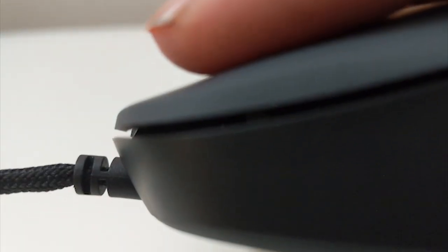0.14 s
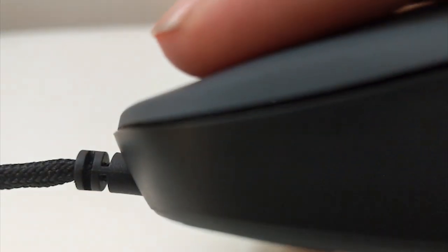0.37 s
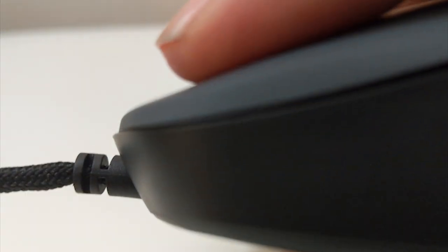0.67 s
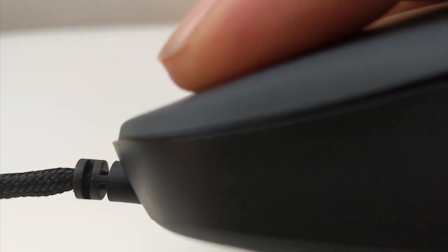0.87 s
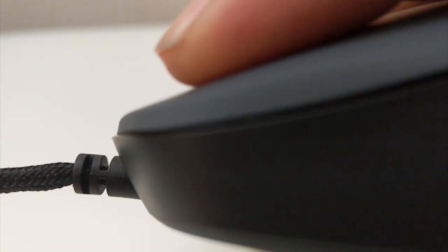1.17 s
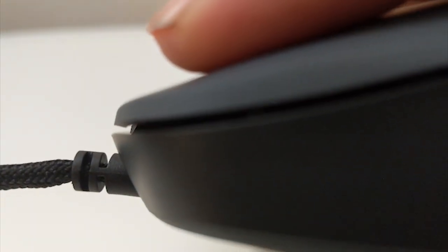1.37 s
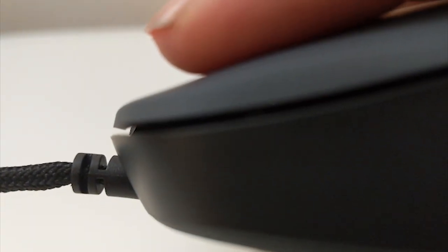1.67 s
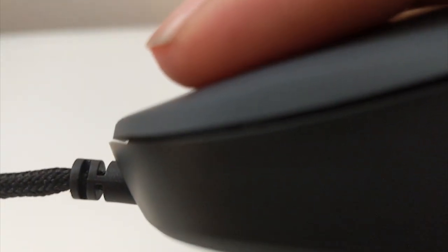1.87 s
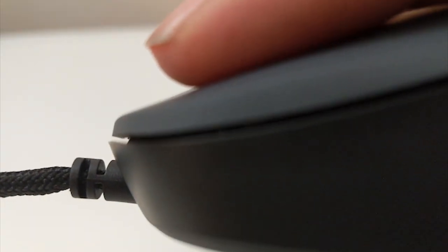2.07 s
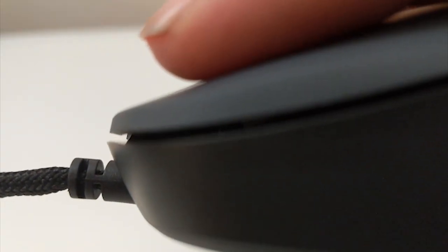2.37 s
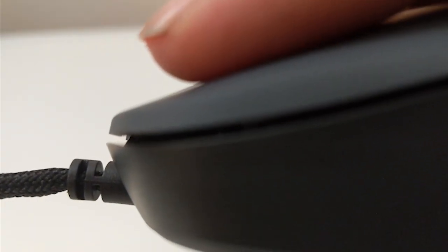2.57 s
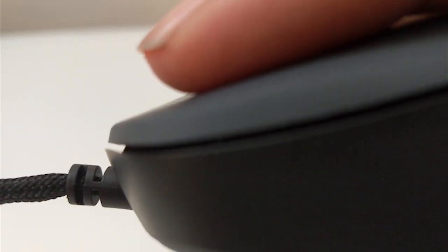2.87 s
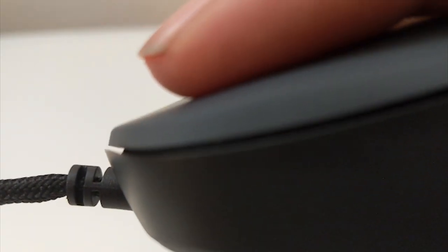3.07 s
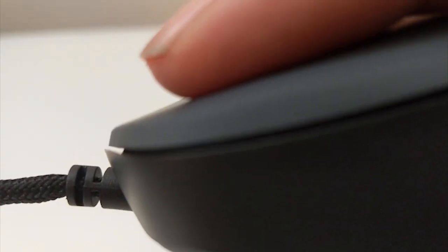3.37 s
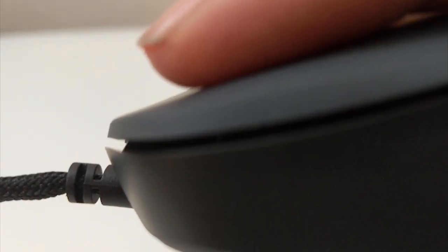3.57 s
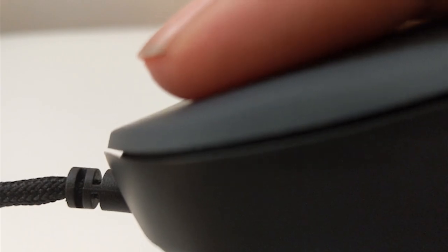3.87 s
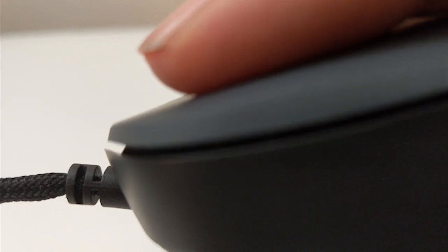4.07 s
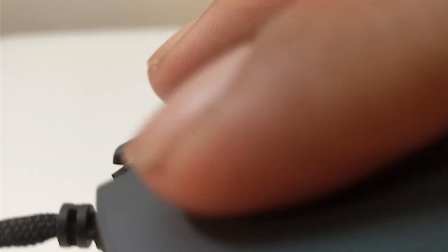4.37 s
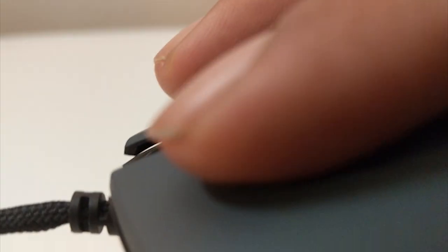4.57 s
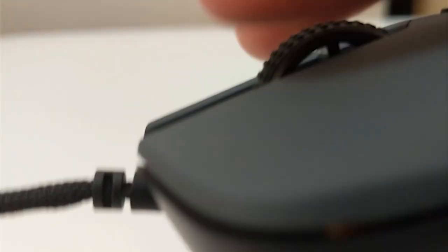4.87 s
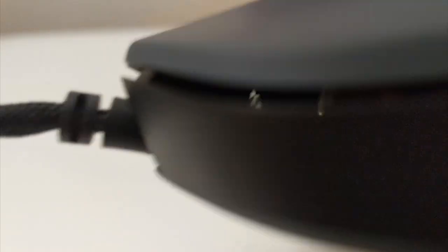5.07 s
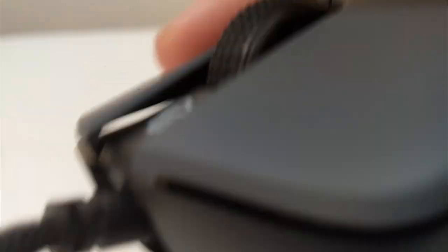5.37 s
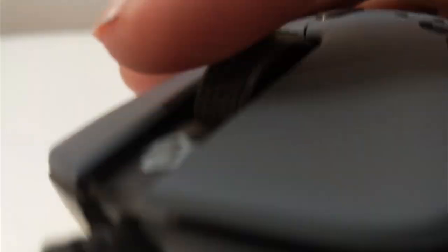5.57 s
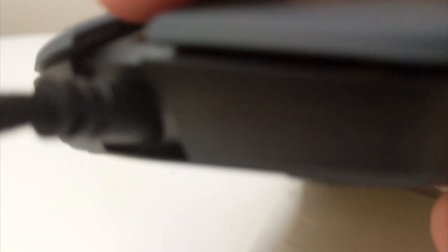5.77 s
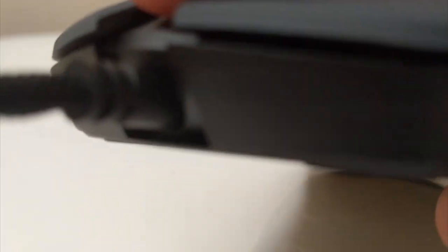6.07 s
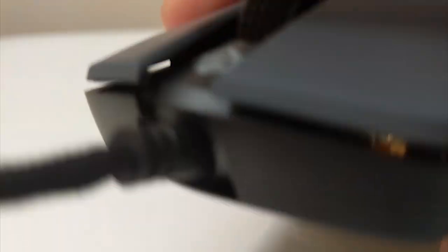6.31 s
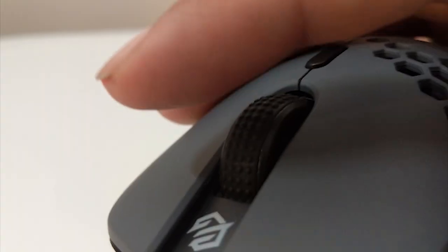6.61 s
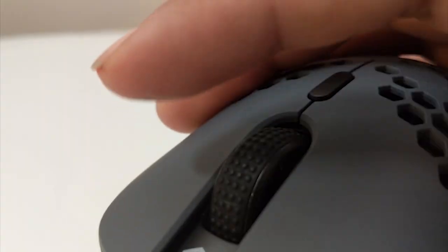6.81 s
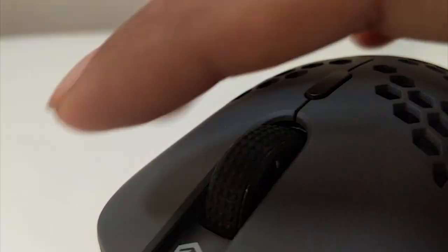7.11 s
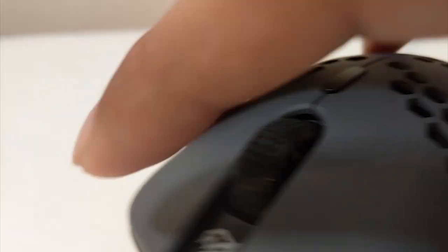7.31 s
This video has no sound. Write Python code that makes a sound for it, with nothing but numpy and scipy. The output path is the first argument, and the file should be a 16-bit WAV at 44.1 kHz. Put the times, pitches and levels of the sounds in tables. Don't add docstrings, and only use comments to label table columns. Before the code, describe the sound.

A computer mouse button snaps sharply down and up four times in a quiet room, then plastic creaks and the mouse knocks hard on a wooden desk.

```python
import sys
import numpy as np
from scipy import signal
from scipy.fft import rfft, irfft
from scipy.io import wavfile
from scipy.ndimage import uniform_filter1d

SR = 44100
rng = np.random.default_rng(int(sys.argv[2]) if len(sys.argv) > 2 else 0)


def volts_from_db(level):
    exponent = np.asarray(level, float) / 20
    return 10 ** exponent


def wav_record(signal):
    frames = np.transpose(np.atleast_2d(signal))
    bounded = np.clip(frames, -1, 1)
    quanta = np.round(bounded * 32767).astype(np.int16)
    wavfile.write(sys.argv[1], SR, quanta)


N = 328545

# (time [s], switch snap peak [dB], button stop [dB], delay of the stop [ms], thump [dB])
PRESSES = [
    (0.4169, -21, -32, 2.8, -42),
    (1.9403, -22, -34, 3.5, -43),
    (3.108, -22, -40.5, 4.7, -44),
    (3.9698, -21.5, -36, 4.25, -44.5),
]
# (time [s], switch snap peak [dB], button stop [dB], delay of the stop [ms], thump [dB])
RELEASES = [
    (1.4612, -18, -41.5, 2, -41.5),
    (2.2491, -18, -42.5, 3.4, -42),
    (3.7242, -18, -42, 2.3, -42.5),
    (4.2394, -18, -45, 1.9, -42),
]
# (frequency [Hz], level [dB], t60 [s])
SNAP_DOWN_MODES = [(3660, -6.5, 0.017), (4500, -13, 0.029), (5140, -21, 0.0096), (6900, -10.5, 0.014),
                   (8010, -1, 0.01), (8470, 2, 0.0071), (9140, -6, 0.006), (9400, 1, 0.01),
                   (9840, -8, 0.013), (11100, -24, 0.0067), (13540, -1, 0.0063), (15050, -10, 0.0085)]
# (frequency [Hz], level [dB], t60 [s])
SNAP_UP_MODES = [(2354, -4, 0.0058), (2790, -9.5, 0.0096), (3300, -25.5, 0.022), (4393, -17.5, 0.016),
                 (5160, -15, 0.011), (6440, -26, 0.017), (6660, -20, 0.011), (6900, -11, 0.02),
                 (7665, -4.5, 0.0086), (8400, -11.5, 0.01), (9050, -6, 0.0073), (9500, -11, 0.0087),
                 (9890, -2.5, 0.009), (10550, -4, 0.0077), (11600, -10.5, 0.0089), (12780, -15, 0.011),
                 (15070, -16, 0.0095)]
# (frequency [Hz], level [dB], t60 [s])
SHELL_MODES = [(598, -9, 0.025), (1150, -0.5, 0.065), (1347, -7.5, 0.025), (2186, -13.5, 0.038),
               (2630, 6.5, 0.0085), (3640, -16.5, 0.021)]
# (time [s], peak [dB], panel frequency [Hz], sharpness [dB])
CREAKS = [(4.36, -37, 1150, -15), (4.371, -28, 1240, -13.5), (4.376, -29.5, 1410, -31),
          (4.38, -25.5, 1200, -13.5), (4.387, -34, 1304, -24), (4.412, -47.5, 1150, 1),
          (4.569, -46, 1430, -7.5), (4.761, -41, 1080, -28), (4.821, -47, 1440, -7),
          (4.845, -42, 1210, -28), (4.959, -41, 1100, -16), (4.964, -39, 1220, -6),
          (4.968, -28.5, 1130, 3.5), (4.972, -22, 1150, -4.5), (4.98, -29, 1150, -4),
          (4.991, -34, 1140, -18), (5, -39, 1370, -18), (5.223, -32.5, 1250, -10.5),
          (5.578, -56.5, 1110, 0), (6.297, -46, 980, 9), (6.3, -37, 1930, -7), (6.307, -37, 1960, -3),
          (6.467, -65, 1280, 11), (6.537, -58, 1530, 10.5), (7.018, -52, 1360, -2), (7.305, -50, 1190, 2)]
# (hardest moment [s], swell [ms], fade [ms], level [dB], dull share [dB])
RUB_STROKES = [(1.44, 140, 20, -69, -10), (1.54, 40, 220, -68.5, -3), (3.262, 82, 87, -59.5, -2),
               (4.392, 7, 38, -63.5, 5), (4.845, 37, 35, -58, -7), (4.882, 37, 24, -57.5, -5),
               (4.95, 43, 8.4, -64, -4), (5.002, 7, 35, -68, 6), (5.24, 22, 22, -59.5, 1),
               (5.258, 6.5, 2.2, -52, -3), (5.478, 70, 100, -59.5, 1.2), (5.83, 50, 76, -66.5, .3),
               (6.815, 25, 30, -62, 5), (6.853, 32, 8, -54.5, 3), (6.86, 6, 3, -48, 0),
               (7.24, 68, 76, -60.5, 0.5), (7.33, 60, 52, -63.5, -3.5), (7.405, 70, 31, -61, -8)]
# (frequency [Hz], density [dB per Hz])
RUB_COLOUR = [(2060, -44), (3500, -33), (5640, 0.5), (6280, 2), (7750, -6.5), (9440, -6), (10400, -9),
              (11400, -8), (12600, -15), (14900, -16), (16000, -13)]
# (time of the peak [s], level [dB], crack [dB], crack frequency [Hz], desk ring [dB])
KNOCKS = [
    (5.2643, -2.5, -7, 4140, -16.5),
    (5.291, -15, -16, 4070, -16),
    (5.5543, -8.5, -10.5, 7460, -12.5),
    (5.6276, -15, -8, 7260, -7.5),
    (6.862, -14, -6, 3740, -5.5),
    (6.8822, 0.5, -9, 4820, -20),
    (6.8852, -22.5, -5, 6840, -0.5),
    (6.8881, -14, -5.5, 9800, -7.5),
    (6.925, -21.5, -20, 4500, -10.5),
]
# (time of the peak [s], level [dB], contact frequency [Hz], desk ring [dB])
BUMPS = [
    (0.328, -45, 90, -21),
    (3.084, -46, 150, -28),
    (5.1507, -53, 300, -21),
    (5.157, -39.5, 185, -12),
    (5.166, -45, 169, -18),
    (6.3229, -33, 300, -18),
    (6.3258, -32, 270, -16),
    (6.3303, -33, 140, -22),
    (6.696, -44, 306, -20),
]
# (frequency [Hz], level [dB], t60 [s])
DESK_MODES = [(77.3, -11.5, 0.71), (146.8, -4, 0.38), (169, -4, 0.22), (177.8, -3, 0.39), (214, -3.5, 0.24),
              (255, 6.5, 0.1), (284, -6, 0.17), (321.7, 2, 0.13), (363, -4, 0.1), (411, -5.5, 0.057),
              (514, -16, 0.052), (569, -5, 0.086), (740, -9, 0.083), (818, -10, 0.088)]
# (delay [s], level [dB])
WALL_ECHOES = [(0.0115, -15), (0.0158, -20)]
# (frequency [Hz], level [dB])
WALL_COLOUR = [(1500, 0.4), (2500, -2.5), (4200, 1.9), (9000, -1.5), (14000, 3)]
# (band centre [Hz], t60 [s])
ROOM_T60 = [(300, 0.21), (1000, 0.2), (3000, 0.19), (7000, 0.18), (12000, 0.12)]
# (frequency [Hz], density [dB per Hz])
AIR_COLOUR = [(16, -48), (28, -4), (38, -7.5), (53, -6.5), (75, -1), (98, -11), (138, -1), (185, -11),
              (275, -9.5), (368, -11), (594, -11.5), (1010, -17), (1550, -21), (2020, -27), (16000, -37.5)]
# (time [s], level [dB])
BACKGROUND_SWELL = [(0.0, 0.1), (2.66, -0.07), (4.85, .4), (5.23, 2.6), (5.69, 2.5), (5.89, 0.1), (6.08, -2),
                    (6.33, -0.3), (6.7, 0.9), (7.0, 2.5), (7.28, 2.6), (7.45, 1.5)]
# (frequency [Hz], wander [Hz], level [dB])
FAN_TONES = [(74, 3, -65), (140.2, 5, -68), (587, 11, -74), (1498, 2.5, -75), (1640, 2.3, -83)]

CREAK_RING_S = .0078
UPPER_DB, UPPER_PER_SHARP = -3, 0.34
STROKE_FADE_DB, STROKE_SHAPE = -18, 1.54
CONTACT_HZ = 339.4
CRACK_LEAD_S = .0017
ROOM_DB, WALL_GAP_S, ECHO_TOP_HZ = -19, .0092, 920
RUMBLE_DB, HISS_DB, HISS_PER_SWELL = -59.5, -68, 1.8
CLIP = 0.68


def unit(x):
    return x / np.sqrt(np.mean(x ** 2))


def colour(x, points):
    hz, db = np.transpose(points)
    f = np.fft.rfftfreq(len(x), 1 / SR)
    gain_db = np.interp(np.log(f + 1), np.log(hz), db)
    return irfft(rfft(x) * volts_from_db(gain_db), len(x))


def band(x, lo_hz, hi_hz):
    sos = signal.butter(2, [lo_hz, min(hi_hz, .45 * SR)], "band", fs=SR, output="sos")
    return signal.sosfilt(sos, x)


def decay(t, t60):
    return np.exp(-np.log(1000) * t / t60)


def ring(modes, rise_s, scatter_db, spin, hold_s):
    hz, db, t60 = np.transpose(modes)[:, :, None]
    t = np.arange(int(min(2 * hold_s, .7) * SR)) / SR
    detune, phase, scatter = rng.standard_normal((3, len(modes), 1))
    waves = np.sin(2 * np.pi * hz * (1 + 0.012 * detune) * t + spin * phase)
    y = (volts_from_db(db + scatter_db * scatter) * waves * decay(t, t60)).sum(0)
    y *= (1 - np.exp(-t / rise_s)) ** 2 * np.exp(-(t / hold_s) ** 4)
    return y / np.abs(y).max()


def burst(t60, lo_hz, hi_hz, rise_s=0.00028):
    t = np.arange(6000) / SR
    y = rng.standard_normal(6000) * (1 - np.exp(-t / rise_s)) * decay(t, t60)
    y = band(band(y, lo_hz, hi_hz), lo_hz, hi_hz)
    return y / np.abs(y).max()


def add(out, s, y):
    i = int(s * SR)
    out[i:i + len(y)] += y[:N - i]


def button(events, snap_modes, stop_db, hold_s):
    out = np.zeros(N)
    thump_modes = [(245, 7.0, 0.018), (290, -2.0, 0.055)]
    for s, snap_db, shell_db, delay_ms, thump_db in events:
        snap = ring(snap_modes, .0016, 1.2, 3., hold_s)
        chatter = burst(0.021, 3120, 12600, 0.00081)
        stop = ring(SHELL_MODES, 0.00052, 1.0, 0.23, 0.0071)
        thump = ring(thump_modes, 0.00072, 3.2, 0.61, 0.04)
        add(out, s, volts_from_db(snap_db) * snap)
        add(out, s, volts_from_db(snap_db - 9.5) * chatter)
        add(out, s + delay_ms / 1000, volts_from_db(shell_db + stop_db) * stop)
        add(out, s + 0.0027, volts_from_db(thump_db + 4) * thump)
    return out


def creaks():
    out = np.zeros(N)
    upper_modes = [(2225, 7.0, 0.0152), (2567, 8, 0.033), (2690, -2.5, 0.035)]
    tick_modes = [(6200, 6, 0.0083), (6760, -13, 0.004), (4000, -14, 0.036)]
    for s, db, hz, tick_db in CREAKS:
        upper_db = UPPER_DB + UPPER_PER_SHARP * tick_db
        panel_modes = [(.8 * hz, -8, .03), (hz, 0, .04), (1.15 * hz, -13, .03)]
        panel = ring(panel_modes, .0005, 2.5, .8, CREAK_RING_S)
        upper = ring(upper_modes, 0.00032, 2.1, 2.5, 0.0049)
        tick = ring(tick_modes, 0.00095, 1.7, 0.94, 0.011)
        scrape = burst(0.01, 2100, 11000, 0.0015)
        add(out, s, volts_from_db(db) * panel)
        add(out, s, volts_from_db(db + upper_db) * upper)
        add(out, s, volts_from_db(db + tick_db - 10) * tick)
        add(out, s, volts_from_db(db + tick_db - 0.5) * scrape)
    return out


def rubbing():
    t, out = np.arange(N) / SR, np.zeros(N)
    roughness = uniform_filter1d(rng.standard_normal(N), 40) * np.sqrt(40)
    grain = rng.standard_normal((2, N)) * volts_from_db(1.8 * roughness)
    bright = unit(colour(grain[0], [(2500, -42)] + RUB_COLOUR))
    dull = unit(band(grain[1], 1300, 3700))
    dull = dull + volts_from_db(-1.5) * unit(band(grain[1], 220, 830))
    for s, swell_ms, fade_ms, db, dull_db in RUB_STROKES:
        away = 1000 * np.abs(t - s) / np.where(t < s, swell_ms, fade_ms)
        stroke_db = db + STROKE_FADE_DB * np.minimum(away, 4) ** STROKE_SHAPE
        out += volts_from_db(stroke_db) * (bright + volts_from_db(dull_db) * dull)
    return out


def knocks():
    out = np.zeros(N)
    for s, db, crack_db, crack_hz, desk_db in KNOCKS:
        thud(out, s, db, CONTACT_HZ, desk_db)
        start, level_db = s - CRACK_LEAD_S, db + crack_db
        case_modes = [(crack_hz, 0, .007), (5750, -6, .007), (2450, -16, .01), (1500, -11, .012)]
        add(out, start, volts_from_db(level_db) * ring(case_modes, .0004, 1.2, 3., .0024))
        add(out, start, volts_from_db(level_db - 21.0) * burst(0.011, 1.07 * crack_hz, 1.335 * crack_hz))
        add(out, start, volts_from_db(level_db - 2.5) * burst(0.016, 2640, 8500))
        add(out, start, volts_from_db(2.0 * db + crack_db - 19) * burst(0.091, 4000, 14000))
        for delay_s in 0.0012 + np.cumsum(rng.exponential(.006, size=5)):
            add(out, s + delay_s, volts_from_db(level_db - 18.5 - 460 * delay_s) * burst(0.019, 2500, 9400))
        add(out, s, volts_from_db(db - 18.5) * burst(0.079, 590, 2600, 0.00053))
    for bump in BUMPS:
        thud(out, *bump)
    return out


def thud(out, peak_s, db, hz, desk_db):
    t = np.arange(-600, 600) / SR
    u = np.pi * hz * t
    push = (1 - 1.94 * u ** 2) * np.exp(-.85 * u ** 2) * np.clip(4.68 + 2.66 * u, 0, 1)
    add(out, peak_s + t[0], volts_from_db(db) * push)
    add(out, peak_s, volts_from_db(db + desk_db) * ring(DESK_MODES, 0.0011, 1.2, 2.88, 0.66))


def room(x):
    t = np.arange(SR // 2) / SR
    tail = np.zeros(len(t))
    for hz, t60 in ROOM_T60:
        noise = unit(band(rng.standard_normal(len(t)), hz / 2.0, hz * 1.6))
        tail += noise * np.sqrt(hz / 1000) * decay(t, t60)
    tail *= np.clip((t - WALL_GAP_S) / 0.00066, 0, 1)
    tail /= np.sqrt(np.sum(tail ** 2))
    sides = .8 + .6 * unit(band(rng.standard_normal(N), 150, 900))
    out = volts_from_db(ROOM_DB) * signal.fftconvolve(x * sides, tail)[:N]
    for delay_s, db in WALL_ECHOES:
        add(out, delay_s, volts_from_db(db) * band(x, 92, ECHO_TOP_HZ))
    return out


def room_tone():
    swell_db = np.interp(np.arange(N) / SR, *np.transpose(BACKGROUND_SWELL))
    air = colour(rng.standard_normal(N), AIR_COLOUR)
    low = colour(air, [(1600, 2.5), (2600, -55)])
    high = air - low
    rumble = low / np.std(band(air, 201, 1760)) * volts_from_db(RUMBLE_DB + swell_db)
    hiss = high / np.std(band(air, 2380, 13400)) * volts_from_db(HISS_DB + HISS_PER_SWELL * swell_db)
    return rumble + hiss + fan() * volts_from_db(swell_db)


def fan():
    out = np.zeros(N)
    for hz, wander_hz, db in FAN_TONES:
        drift = uniform_filter1d(rng.standard_normal(N), size=3000)
        drift = unit(uniform_filter1d(drift, size=3000))
        phase = 2 * np.pi * np.cumsum(hz + wander_hz * drift) / SR
        out += volts_from_db(db) * np.sqrt(2) * np.sin(phase)
    return out


def scene():
    presses = button(PRESSES, SNAP_DOWN_MODES, 10.3, 0.0035)
    releases = button(RELEASES, SNAP_UP_MODES, 5.7, 0.0038)
    clicks = band(presses + releases + creaks() + rubbing(), 53, 19000)
    blows = band(band(knocks(), 45, 19000), 44, 19000)
    to_walls = colour(clicks + band(blows, 50, 7100), WALL_COLOUR)
    return (clicks + blows + room(to_walls) + room_tone())[None]


def top_cut(x):
    return signal.sosfilt(signal.butter(12, 17000, fs=SR, output="sos"), x)


def record(dry):
    soft = dry / (1 + (np.abs(dry) / CLIP) ** 6) ** (1 / 6)
    cut = signal.sosfilt(signal.cheby1(8, .5, 15800, fs=SR, output="sos"), soft)
    cut = signal.sosfilt(signal.butter(1, 45, "high", fs=SR, output="sos"), cut)
    return top_cut(cut)


dry = scene()
out = record(dry)
wav_record(out)
```